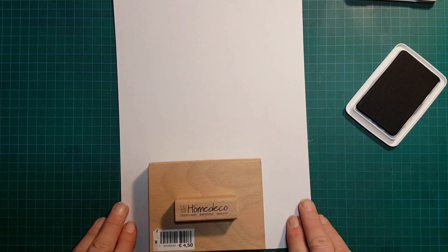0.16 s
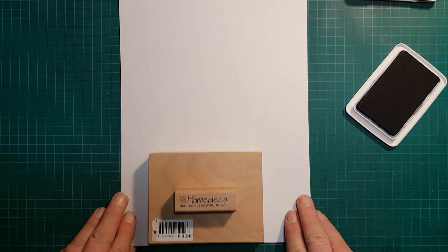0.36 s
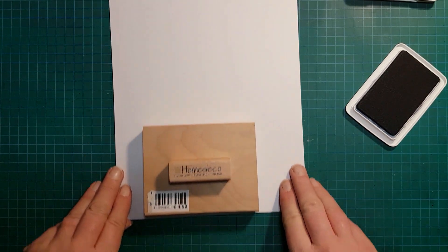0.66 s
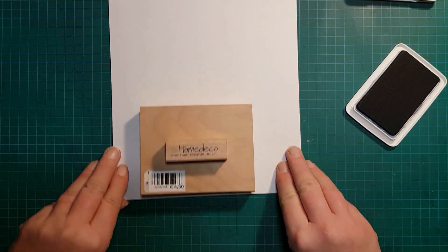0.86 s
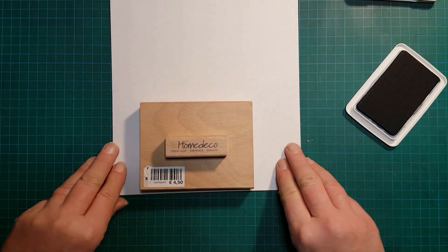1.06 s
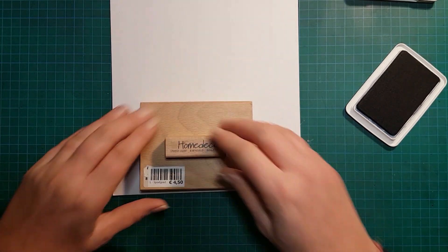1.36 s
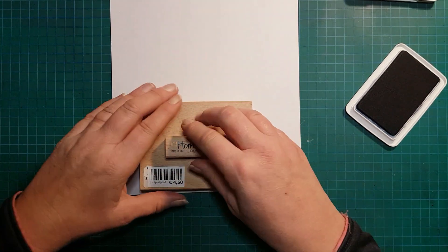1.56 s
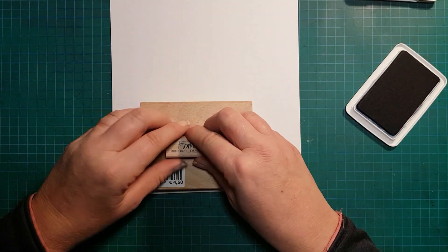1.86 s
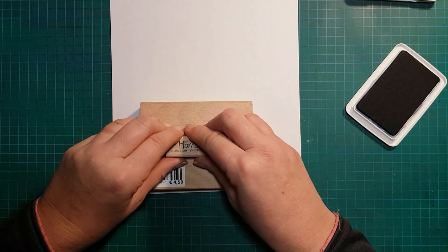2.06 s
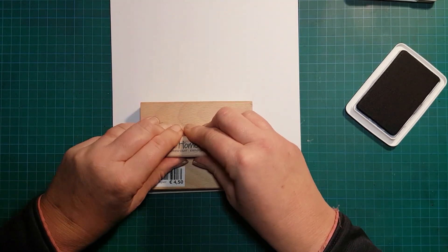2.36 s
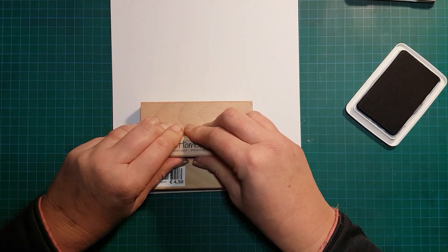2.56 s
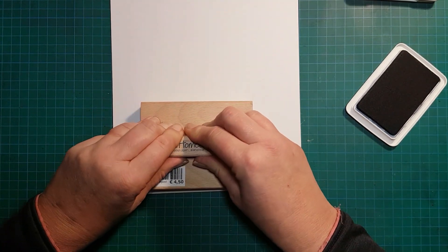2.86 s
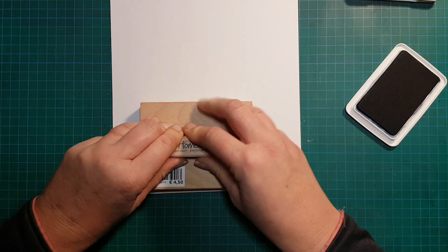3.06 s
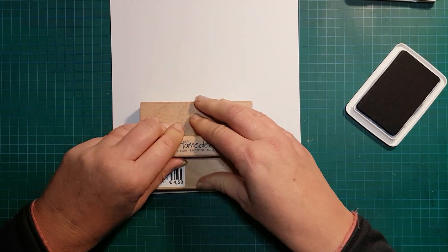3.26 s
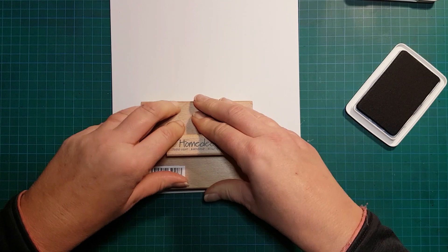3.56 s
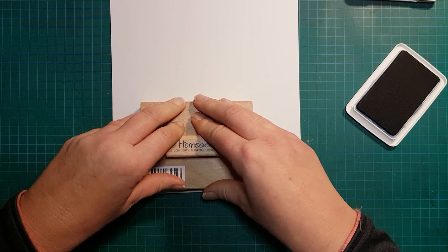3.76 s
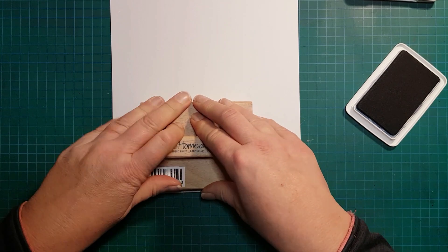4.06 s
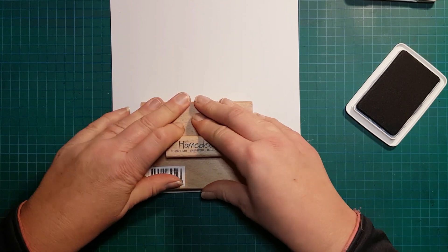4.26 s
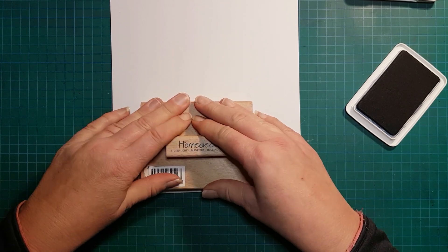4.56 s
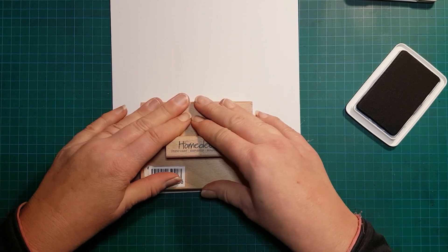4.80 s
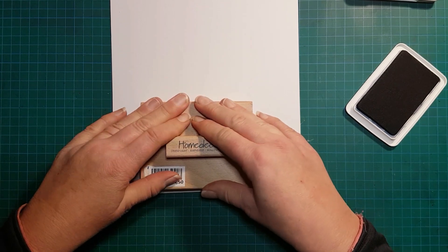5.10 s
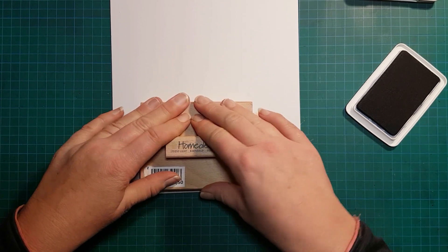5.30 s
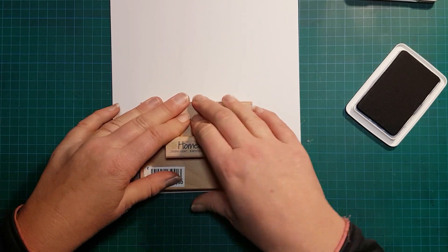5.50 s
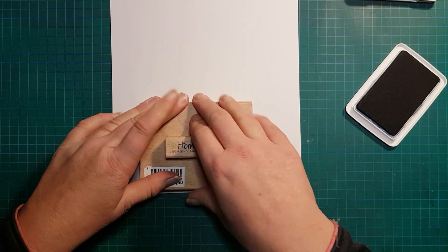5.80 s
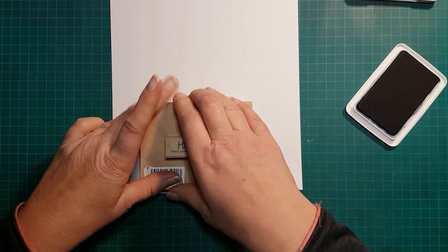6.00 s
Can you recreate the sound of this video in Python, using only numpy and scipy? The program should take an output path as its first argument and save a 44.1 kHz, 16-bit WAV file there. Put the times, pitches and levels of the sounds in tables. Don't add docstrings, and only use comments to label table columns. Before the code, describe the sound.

Paper rustles and snaps as it slides across a craft mat, then hands grip a wooden block and press it with dull thumps and ticks.

```python
import sys
import numpy as np
from scipy import signal
from scipy.fft import rfft, irfft, next_fast_len
from scipy.io import wavfile

SR = 44100
rng = np.random.default_rng(int(sys.argv[2]) if len(sys.argv) > 2 else 0)


def invert_db(x):
    u = np.asarray(x, float) / 20
    return 10 ** u


def wav_record(signal):
    frames = np.transpose(np.atleast_2d(signal))
    bounded = np.clip(frames, -1, 1)
    quanta = np.round(bounded * 32767).astype(np.int16)
    wavfile.write(sys.argv[1], SR, quanta)


N = 270774

# start_s, force_db, hardness_db
HAND_PUSHES = [(.022, -42, -34), (0.117, -40, -27), (0.369, -44.5, -6), (.423, -53, 3), (2.071, -57, 11),
               (2.302, -42.5, -6.5), (2.314, -42, 6), (2.325, -42, -20), (2.425, -45, 3), (2.444, -42, 4),
               (2.463, -51, -16), (2.48, -39, -4), (2.578, -52, 0.5), (2.834, -50, 3), (2.953, -52.5, 2),
               (3.065, -47, 6.5), (3.203, -42, -11), (3.426, -33, -16), (3.463, -32, -11), (3.49, -32, -21),
          (3.51, -53, 12), (3.544, -32, -5), (3.744, -32, -14.5), (3.914, -61, -13), (4.335, -36.5, -3.5),
          (4.389, -30.5, -7.5), (4.43, -45, 0), (4.457, -39, -6), (4.48, -50.5, 0), (4.501, -49, -16),
          (4.824, -33, -5), (4.875, -38.5, -5), (4.996, -48.5, 2), (5.156, -40.5, -21), (5.239, -48, -12),
          (5.292, -43, -4.5), (5.448, -50.5, -1), (5.548, -45.5, -21), (5.658, -53, -13), (5.828, -44, 4),
          (5.844, -60.5, 11.5), (5.904, -56, -18), (5.994, -33.5, -17), (6.098, -42, -16)]
PUSH_UPPER_DB = -4
# start_s, level_db
TAPS = [(.022, -50), (.423, -39.5), (2.071, -53.5), (2.159, -67), (2.302, -31.5), (2.314, -36.5),
        (2.325, -42), (2.455, -36.5), (2.481, -50), (2.707, -48), (2.836, -48.5), (3.854, -46.5),
        (4.045, -44), (4.202, -38), (4.389, -38), (4.875, -47.5), (4.99, -42), (5.089, -42.5), (5.157, -48),
        (5.904, -45), (5.919, -41), (5.994, -48)]
TAP_MIDDLE_DB = -14.5
# time_s, rustle_db, catch_db (fibres over rustle), load_db (on the table)
NUDGE = [
    (0.0, -68, 5.5, -56),
    (.036, -64, 2, -52.5),
    (.11, -62.5, 0, -62),
    (.125, -66.5, 11, -51),
    (.264, -70, 8, -72),
]
# time_s, rustle_db, catch_db (fibres over rustle), load_db (on the table)
SLIDE = [
    (.3, -64, 5.5, -79),
    (.39, -56, 2.5, -61),
    (.448, -53.5, 7.5, -40.5),
    (.526, -51, 3, -40),
    (.642, -50, 4.5, -39.5),
    (.78, -49.5, 1, -40.5),
    (.862, -53.5, 4.5, -47),
    (.974, -59.5, 6, -51.5),
    (1.018, -92, 8, -87),
]
# time_s, weight_db, fidget_db
LEAN = [(1.1, -67, -62.5), (1.56, -73, -68.5), (1.83, -62.5, -68), (1.95, -54, -54.5), (2.1, -59.5, -47),
        (2.3, -58, -56.5), (2.46, -60, -59.5), (2.9, -69, -65.5), (3.11, -52, -54), (3.4, -72, -62.5),
        (3.6, -47, -59), (3.72, -69, -60), (3.93, -53, -54.5), (4.45, -71, -67), (4.62, -68, -63),
        (5.3, -66.5, -61), (5.68, -53.5, -63.5), (6.14, -65, -58)]
# pitch_hz, level_db, t60_s
BOOM_MODES = [(142, 0, 0.15), (97.4, -17.5, 0.31), (130.2, -9, 0.13)]
# pitch_hz, level_db, t60_s
MIDDLE_MODES = [(205.3, 0, 0.098), (264.6, -4, 0.09), (305.6, -4.5, 0.081), (357.6, 2.5, 0.076),
                (447, -5.5, 0.082)]
# pitch_hz, level_db, t60_s
UPPER_MODES = [(502, 2.5, 0.019), (600, -19, 0.029), (713, -5.5, 0.025), (871, -10, 0.03),
               (1076, -7, 0.009)]
CREAK_DB, CREAK_FOLLOWS = -45.5, 1
RUMBLE_DB, PALMS_DB = -6.5, -16
# peak_s, level_db
SWAY = [(.1, -55), (.38, -49.5), (1.9, -68), (2.46, -55), (3.21, -65), (3.46, -51), (3.76, -59),
        (3.98, -64), (4.41, -58), (4.84, -54), (5.3, -58), (6.02, -50.5)]
SWAY_RISE_DB_PER_S, SWAY_FALL_DB_PER_S, LEGS_REST_DB, LEGS_SLIDE_DB = 183, 128, -68, -24

# start_s, peak_db, pitch_hz, ringing_share (0-1)
TICKS = [(2.2886, -51, 3300, 0.9), (2.304, -47.5, 2470, 1), (2.319, -47, 2490, 1), (2.5925, -50, 2810, .9),
         (2.7078, -46, 2540, 0), (3.075, -37, 2340, 1), (3.4273, -38.5, 1940, 0.3), (3.49, -31, 2180, 0.47),
         (3.5408, -30.5, 1800, 0.45), (3.7404, -49, 1940, 0.2), (3.747, -45, 2010, 0.2),
         (3.854, -48, 1570, 0.55), (3.899, -48, 1660, 0.55), (3.926, -44.5, 2790, 0.2),
         (4.148, -47, 4800, 0.74), (4.2047, -33.5, 3300, 0.3), (4.339, -42.5, 1920, 0.66),
         (4.391, -35, 1970, .5), (4.4434, -38.5, 2940, 0.66), (4.7082, -47, 1500, .3),
         (4.7815, -45.5, 2580, .2), (4.8236, -35, 2300, 0.42), (4.8737, -36, 1900, 0.3),
         (4.9913, -37, 1950, 0.27), (5.2145, -49.5, 1800, 0.6), (5.292, -43, 2000, .3),
         (5.829, -38.5, 4480, 0.4), (5.9969, -36, 2280, 0.44)]
TICK_T60_S, TICK_T60_S_PER_DB = .013, .0009
WOOD_CRISP_DB = -26
# start_s, peak_db, pitch_hz, crispness_db
SNAPS = [(.16, -43, 5500, -6), (.166, -43.5, 1340, -14), (.2284, -46, 3310, 2), (0.2932, -39, 4150, -24),
         (.4374, -30, 4050, -5), (.4524, -27.5, 4200, -14), (.4674, -31, 3800, -15),
         (0.4935, -30, 3530, -8), (0.562, -39, 1690, -2), (.625, -28, 1730, -6), (.6304, -28, 5460, -1),
         (0.6607, -38, 1960, 32), (.7114, -33, 4760, 3), (.7594, -42, 2220, -6), (.81, -31.5, 1560, -12),
         (.8634, -41, 2240, 23), (.8753, -40, 4300, -7), (.9198, -31, 5270, -4), (.9694, -48, 2610, 8),
         (1.034, -37.5, 3200, -16)]
SNAP_T60_S, SNAP_RINGING = 0.023, 0.64
# start_s, peak_db
SLIPS = [
    (1.9914, -49),
    (2.0235, -48),
    (2.059, -45),
    (2.0622, -38),
    (2.0712, -36.5),
    (2.082, -41),
    (2.1113, -42),
    (2.1364, -57),
    (2.16, -38.5),
]
SLIP_HZ, SLIP_T60_S, SLIP_RINGING, SLIP_CRISP_DB = 2430, .017, 0.38, 3.5
# start_s, peak_db, pitch_hz
RAPS = [(0.1665, -24, 376), (2.113, -31, 455), (2.161, -28.5, 600), (2.4243, -29, 334), (3.0645, -43, 337),
        (.1665, -38, 1100), (.42, -36, 151), (2.334, -33, 1500), (2.7075, -43, 745), (3.069, -42, 770),
        (4.2035, -36, 800), (4.8245, -38, 900), (4.992, -34, 450)]
# start_s, peak_db, low_edge_hz, t60_s
CRACKS = [(.128, -41, 4000, 0.013), (0.4155, -40, 3000, 0.0051), (.435, -41, 3200, 0.0067),
          (.4415, -33, 3300, .008), (.448, -33, 3300, .008), (.4545, -34, 2500, .006),
          (.48, -40, 3300, .006), (0.491, -36, 3500, 0.0089), (.5605, -29, 8000, .006),
          (.606, -41, 4500, .008), (.628, -34, 8000, .005), (.717, -39, 4000, .006),
          (.779, -38, 2000, .006), (.824, -40, 6000, .006), (.842, -34, 9000, .006),
          (.873, -30, 7000, .005), (.878, -32, 5000, .005), (.909, -34, 8000, .005),
          (.946, -43, 4000, .006), (.968, -36, 4000, .008), (2.0575, -50, 2400, .01),
          (2.0712, -45, 2600, .01), (2.083, -45, 2800, 0.012), (2.1365, -50, 3300, .008),
          (3.071, -41, 3500, 0.007), (3.0766, -32, 8500, .012), (3.085, -31, 8000, .012),
          (3.0745, -31, 3470, .008), (3.0772, -33, 3500, .01), (3.079, -27, 3000, .008),
          (3.0835, -27, 2040, 0.0075), (3.0878, -21.5, 2560, 0.0033), (3.089, -30, 2520, .008),
          (3.268, -43, 6000, .01), (3.4808, -43, 1500, .008), (3.4872, -44, 2500, 0.011),
          (3.4955, -30, 1500, 0.0093), (3.5413, -42, 4000, .01), (3.548, -40, 2000, 0.0084),
          (4.2032, -54, 5000, .01), (4.874, -48, 6000, .012), (4.991, -60, 4000, .008),
          (5.549, -51, 2500, .008), (5.8277, -43.5, 3500, .01), (5.9033, -49, 1500, .008),
          (5.9095, -52, 2000, .008), (5.9167, -41, 1500, 0.0089), (5.9957, -45, 6500, .014)]
CRACK_OCTAVES, CRACK_SIDE, CRACK_RIGHT_DB = 1.2, .4, -1

# start_s, level_db, dryness (0 dull - 1 bright - 2 fizzy), length_s, t60_s
SCUFFS = [(0.121, -57.5, 0.4, 0.011, .059), (1.03, -56, 1.2, 0.0061, 0.033),
          (2.303, -62.5, 1.1, 0.041, 0.22), (3.069, -40, 0.2, 0.021, 0.018), (3.077, -42, 1, 0.0072, 0.014),
          (3.083, -52, 1.5, 0.021, 0.2), (3.175, -63, 1.5, 0.042, .31), (3.246, -54, 2, 0.051, .085),
          (3.455, -42.5, -0.58, 0.051, .17), (3.468, -58, 3, .03, 0.36), (3.508, -50, -0.82, 0.046, 0.084),
          (4.198, -61, 1, 0.011, .08), (5.08, -55, -0.5, 0.024, 0.12), (5.891, -44.5, -0.98, 0.031, .06),
          (5.987, -54, -0.5, .02, 0.071)]
DRYNESS_DB = 7
# start_s, level_db, pitch_hz, width_hz, length_s
WHISPERS = [
    (0.428, -47, 4300, 1600, 0.033),
    (3.068, -48, 4900, 1600, 0.033),
    (3.461, -59, 2980, 900, 0.12),
    (2.188, -69, 4400, 600, 0.063),
    (3.0668, -47, 2250, 700, 0.014),
    (3.069, -43, 2470, 346, 0.045),
    (3.073, -46.5, 9860, 600, 0.03),
    (3.178, -55.5, 2740, 700, 0.072),
    (3.242, -61, 2720, 600, 0.12),
    (3.479, -55.5, 9830, 600, 0.038),
]
FIZZ_DB = -10.5
# freq_hz, density_db (per Hz)
SCUFF_COLOUR = [(350, -3.5), (600, -12), (1100, -12), (1530, -12), (1820, 0), (2120, -5), (2290, -2),
                (3150, -14), (6000, -35), (7800, -55), (13200, -120)]
# freq_hz, density_db (per Hz)
SCRAPE_COLOUR = [(1500, -31), (2800, -3), (4000, 6.5), (6200, 2.5), (8000, -5.5), (10000, -21)]
# freq_hz, density_db (per Hz)
RUSTLE_COLOUR = [(290, -42), (500, -11.5), (802, -6), (871, -8.5), (1020, -2.5), (1210, -3.5), (1480, -0.5),
                 (3000, -4), (3900, -12), (6600, -120)]
# freq_hz, density_db (per Hz)
FIZZ_COLOUR = [(4120, -38), (7000, -11), (9070, -2.5), (11600, 1.5), (13500, 2), (15100, -2.5), (16000, -2)]
# freq_hz, side_over_middle_db
SCUFF_SIDE = [(60, -20), (240, -8), (950, -8), (3770, -12), (15000, -4)]
# freq_hz, side_over_middle_db
RUB_SIDE = [(60, -11), (180, -18), (550, -4), (1650, -11.5), (4970, 1), (15000, 2)]

ROOM_T60_S, ROOM_DB, WALL_CUT_HZ = 0.17, -8, 6400
# freq_hz, density_db (per Hz)
HISS_COLOUR = [(20, -18), (40, -6), (62, -3.5), (130, -1.5), (250, -8.5), (500, -8), (1000, -12.5),
               (2000, -12.5), (3200, -17.5), (5000, -23), (8000, -28), (10000, -27), (12000, -23),
               (15900, -18.5)]
# freq_hz, side_over_middle_db
HISS_SIDE = [(60, -6), (180, 2), (550, 0.5), (1650, 0.5), (4970, 0.5), (15000, 0)]
HISS_DB = -57
# pitch_hz, width_hz, level_db
WHINES = [
    (13300, 60, -72.5),
    (14400, 200, -76),
    (15650, 400, -77),
]
CUTOFF_HZ = 15860


def thumps():
    clicks = np.zeros((3, N))
    for s, force_db, hard_db in HAND_PUSHES:
        clicks[:, int(s * SR)] += invert_db(force_db + np.array([0, hard_db, hard_db + PUSH_UPPER_DB]))
    for s, tap_db in TAPS:
        clicks[1:, int(s * SR)] += invert_db(tap_db + np.array([TAP_MIDDLE_DB, 0]))

    load_db = in_time(NUDGE + SLIDE)[2]
    weight_db, fidget_db = in_time(LEAN)
    boom = invert_db(load_db) + invert_db(weight_db)
    creak = invert_db(CREAK_DB + CREAK_FOLLOWS * (load_db + 40)) + invert_db(fidget_db)
    tremble = invert_db(-33.5 + 1.0 * drift(18))

    low = table(BOOM_MODES, clicks[0] * invert_db(-0.5), tremble * boom,
                spread_db=1.6, scrub=0.57, scrub_s=0.017)
    middle = table(MIDDLE_MODES, clicks[1] * invert_db(-3.5), tremble * creak * invert_db(-6.5),
                   spread_db=2.0, scrub=0.8, scrub_s=0.011)
    upper = table(UPPER_MODES, clicks[2] * invert_db(-0.5), tremble * creak * invert_db(-10),
                  spread_db=2.5, scrub=0.86, scrub_s=0.016)
    top = band(low, 76, 320) + band(middle, 111, 730) + band(upper, 550, 2000)
    rumble = invert_db(load_db + RUMBLE_DB) * rms_one(band(rng.standard_normal(N), 114, 313))
    return top + legs(load_db) + rumble


def table(modes, clicks, drive, spread_db, scrub, scrub_s):
    out = np.zeros(N)
    at = np.flatnonzero(clicks)
    r = np.exp(-1 / (scrub_s * SR))
    dragging = scrub * signal.lfilter([np.sqrt(1 - r * r)], [1, -r], clicks)
    for k, (hz, level_db, t60) in enumerate(modes):
        force = (dragging + drive / np.sqrt(t60)) * rng.standard_normal(N)
        uneven = invert_db(spread_db * rng.standard_normal(len(at)))
        force[at] += clicks[at] * uneven * (-1) ** (k + 1)
        out += invert_db(level_db) * ring(force, hz, t60)
    return out


def legs(load_db):
    s, peak_db = np.transpose(SWAY)
    t = np.arange(0, N, 64) / SR - s[:, None]
    slope_db = np.minimum(SWAY_RISE_DB_PER_S * t, -SWAY_FALL_DB_PER_S * t)
    rocks = invert_db(peak_db[:, None] + slope_db).sum(axis=0)
    swing = np.interp(np.arange(N) / 64, np.arange(len(rocks)), rocks)
    swing = swing + invert_db(LEGS_REST_DB) + invert_db(load_db + LEGS_SLIDE_DB)
    return swing * rms_one(band(rng.standard_normal(N), 39.3, 73))


def ticks():
    out, t = np.zeros(N + 3000), np.arange(3000) / SR
    for s, peak_db, hz, crisp_db, t60, ringing in tick_rows():
        snap = rng.standard_normal(3000) * invert_db(-60 * t / max(t60, .003))
        snap[0] = 8.0
        broad = band(band(snap, 600, 3700), 600, 3700)
        narrow = band(snap, 0.84 * hz, 1.082 * hz)
        share = np.clip(ringing, 0, 1)
        body = (1 - share) * broad / np.abs(broad).max() + share * narrow / np.abs(narrow).max()
        crack = band(snap * invert_db(-60 * t / 0.0043), 7700, 21000)
        out[round(s * SR):][:3000] += invert_db(peak_db + 1.5) * body + invert_db(peak_db + crisp_db - 23) * crack
    for s, peak_db, hz in RAPS:
        swell = 2.2 * hz * t * np.exp(-1.9 * hz * t)
        out[round(s * SR):][:3000] += invert_db(peak_db) * np.sin(2 * np.pi * hz * t) * swell
    return out[:N]


def tick_rows():
    rows = [(*snap, SNAP_T60_S, SNAP_RINGING) for snap in SNAPS]
    rows += [(s, db, SLIP_HZ, SLIP_CRISP_DB, SLIP_T60_S, SLIP_RINGING) for s, db in SLIPS]
    for s, db, hz, share in TICKS:
        t60 = TICK_T60_S + TICK_T60_S_PER_DB * (db + 46)
        rows.append((s, db, hz, WOOD_CRISP_DB, t60, share))
    return rows


def cracks():
    out, t = np.zeros((2, N + 900)), np.arange(900) / SR
    for s, peak_db, low_hz, t60 in CRACKS:
        burst = rng.standard_normal((2, 900)) * invert_db(-60 * t / max(t60, .002))
        middle, side = band(burst, low_hz, low_hz * 2 ** CRACK_OCTAVES)
        left = middle + CRACK_SIDE * side
        right = invert_db(CRACK_RIGHT_DB) * (middle - CRACK_SIDE * side)
        out[:, round(s * SR):][:, :900] += invert_db(peak_db) * np.array([left, right]) / np.abs(middle).max()
    return out[:, :N]


def slide():
    rustle_db, catch_db, _ = in_time(NUDGE + SLIDE)
    fidget_db = in_time(LEAN)[1]
    scrape_db = rustle_db + catch_db
    streams = grit(per_s=700, spread_db=3.0, share=0.4) * invert_db(1.0 * drift(40))
    rustle_level = invert_db(rustle_db + 4.5) + invert_db(fidget_db + PALMS_DB)
    rustle = rustle_level * coloured(streams[:2], RUSTLE_COLOUR, RUB_SIDE)
    scrape = invert_db(scrape_db + 1.5 * drift(44)) * coloured(streams[1:3], SCRAPE_COLOUR, RUB_SIDE)
    fizz = invert_db(scrape_db + FIZZ_DB + 8.0) * coloured(streams[2:], FIZZ_COLOUR, RUB_SIDE)
    return rustle + scrape + fizz


def scuffs():
    t, levels = np.arange(SR // 4) / SR, np.zeros((3, N + SR))
    for s, level_db, dryness, length, t60 in SCUFFS:
        loss_db = DRYNESS_DB * (np.arange(3) - dryness) ** 2
        colour_db = level_db - loss_db + loss_db.min()
        swell = np.clip(t / (.55 * length), 0, 1) ** 2
        shape = swell * invert_db(-60 * np.maximum(t - length, 0) / t60)
        levels[:, round(s * SR):][:, :len(t)] += invert_db(colour_db)[:, None] * shape
    streams = grit(per_s=500, spread_db=3.5, share=0.48) * invert_db(0.89 * drift(76))
    dull = levels[0, :N] * coloured(streams[:2], SCUFF_COLOUR, SCUFF_SIDE)
    bright = levels[1, :N] * coloured(streams[1:3], SCRAPE_COLOUR, RUB_SIDE)
    fizzy = levels[2, :N] * coloured(streams[2:], FIZZ_COLOUR, RUB_SIDE)
    return dull + bright + fizzy


def block():
    out = np.zeros(N)
    for s, level_db, hz, width, length in WHISPERS:
        phase = np.linspace(0, 1, round(length * SR))
        noise = rng.standard_normal(9000)
        whisper = rms_one(band(noise, hz - width / 2, hz + width / 2))[:len(phase)]
        out[round(s * SR):][:len(phase)] += invert_db(level_db) * whisper * np.sin(np.pi * np.sqrt(phase))
    return out


def room(x):
    size = next_fast_len(N + SR)
    w = 2 * np.pi * np.fft.rfftfreq(size, 1 / SR)
    dull = 1 / (1 + 1j * w / (2 * np.pi * WALL_CUT_HZ))
    tails = np.zeros((2, len(w)), complex)
    for k, lag in enumerate(rng.uniform(.009, .04, 16)):
        loop = invert_db(-60 * lag / ROOM_T60_S) * dull * np.exp(-1j * w * lag)
        tails[k % 2] += loop / (1 - loop) * (-1) ** (k // 2)
    return irfft(tails * rfft(x, size), size)[:, :N]


def hiss():
    out = invert_db(HISS_DB - 2.04) * coloured(rng.standard_normal((2, N)), HISS_COLOUR, HISS_SIDE)
    for hz, width, level_db in WHINES:
        out += invert_db(level_db) * rms_one(ring(rng.standard_normal((2, N)), hz, 2.2 / width))
    return out


def grit(per_s, spread_db, share):
    sizes = invert_db(spread_db * np.minimum(rng.exponential(1, N), 4))
    grains = (rng.random(N) < per_s / SR) * sizes
    grains = signal.lfilter([1], [1, -.9], grains)
    return rng.standard_normal((4, N)) * (1 + share * rms_one(grains))


def coloured(streams, spectrum, side_db):
    size = next_fast_len(N)
    hz = np.maximum(np.fft.rfftfreq(size, 1 / SR), 10)
    inside = (hz > spectrum[0][0]) * (hz < spectrum[-1][0])
    middle, side = rfft(streams, size) * invert_db(at_hz(spectrum, hz)) * inside
    side = side * invert_db(at_hz(side_db, hz))
    return irfft([middle + side, middle - side], size)[:, :N] / np.std(irfft(middle, size))


def ring(clicks, hz, t60):
    r, w = invert_db(-60 / (t60 * SR)), 2 * np.pi * hz / SR
    return signal.lfilter([0, np.sin(w)], [1, -2 * r * np.cos(w), r * r], clicks + 1e-18)


def band(x, low_hz, high_hz):
    edges = [low_hz, min(high_hz, .45 * SR)]
    return signal.sosfilt(signal.butter(2, edges, "band", fs=SR, output="sos"), x)


def drift(rate):
    r = np.exp(-80 * np.pi * rate / SR)
    noise = rng.standard_normal(N // 40 + 2002)
    slow = signal.lfilter([1], [1, -2 * r, r * r], noise)[2000:]
    return np.interp(np.arange(N) / 40, np.arange(len(slow)), rms_one(slow))


def in_time(rows):
    s, *columns = np.transpose(rows)
    return [np.interp(np.arange(N) / SR, s, c, right=-120) for c in columns]


def at_hz(points, hz):
    freq_hz, level_db = np.transpose(points)
    return np.interp(np.log(hz), np.log(freq_hz), level_db)


def rms_one(x):
    return x / np.sqrt(np.mean(x ** 2) + 1e-20)


def scene():
    knocks, clicks = thumps(), ticks()
    rubs = scuffs() + block() + slide()
    sent = 0.88 * knocks + 0.88 * clicks + 0.75 * rubs.mean(axis=0)
    wet = invert_db(ROOM_DB) * room(band(sent, 267, 12000))
    return knocks * invert_db(np.array([[-.8], [.8]])) + clicks + rubs + wet + hiss() + cracks()


def top_cut(x):
    return signal.sosfilt(signal.butter(12, 16930, fs=SR, output="sos"), x)


def record(dry):
    low_pass = signal.ellip(12, .3, 60, CUTOFF_HZ, fs=SR, output="sos")
    mix = signal.sosfilt(low_pass, dry) - .0017
    return top_cut(mix)


dry = scene()
out = record(dry)
wav_record(out)
```